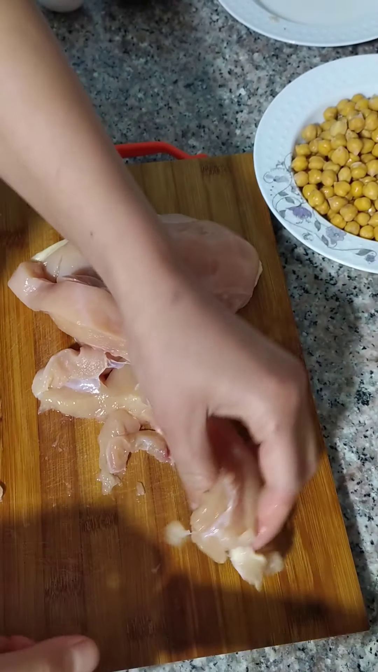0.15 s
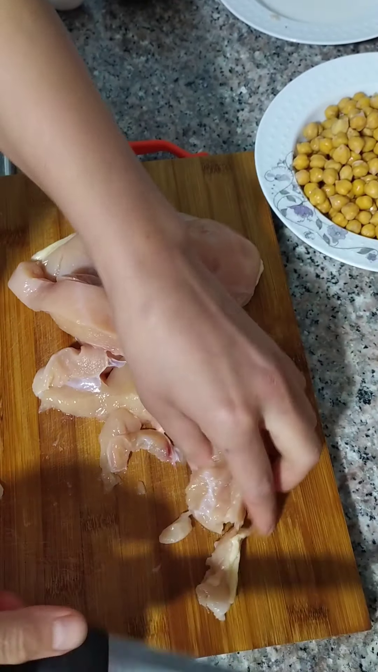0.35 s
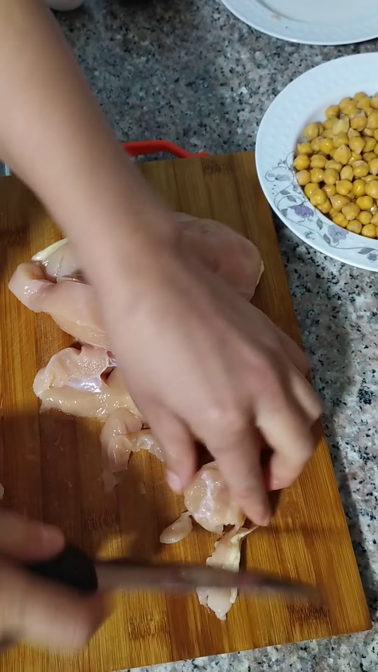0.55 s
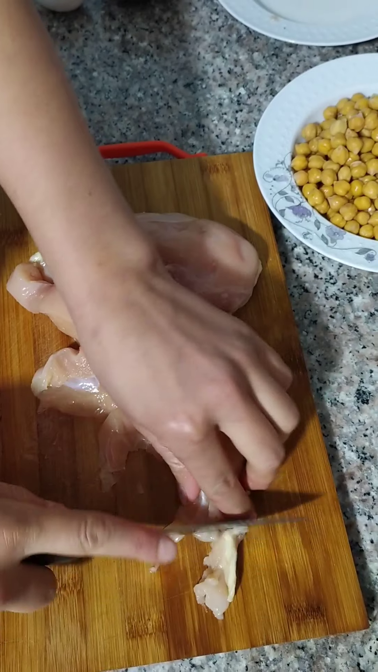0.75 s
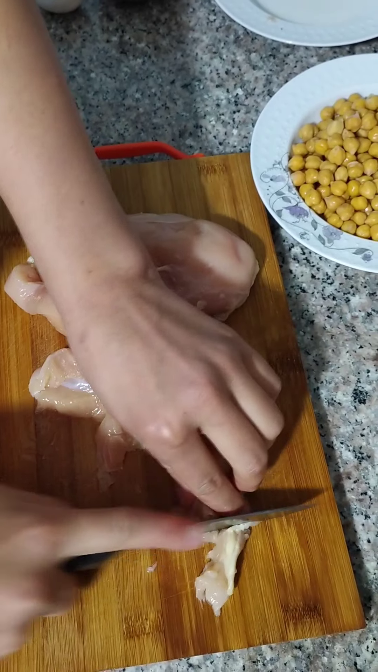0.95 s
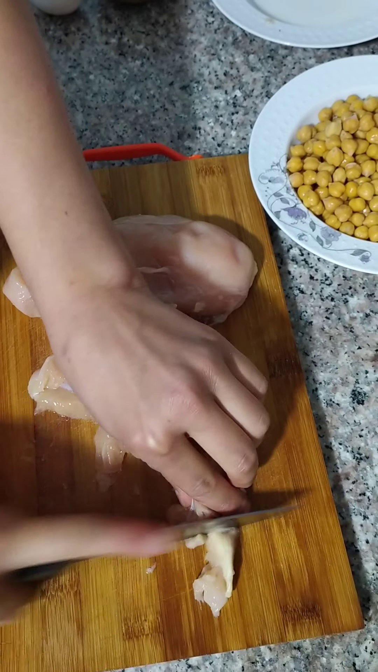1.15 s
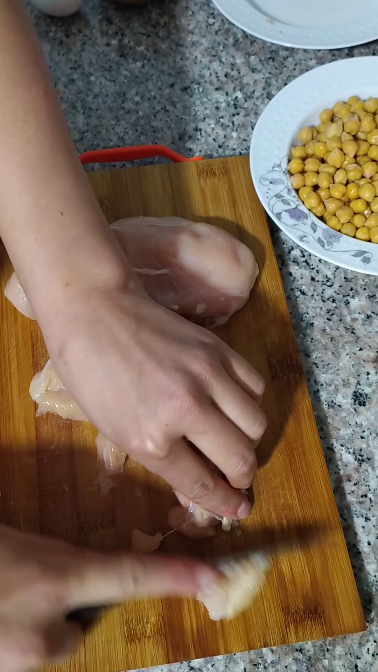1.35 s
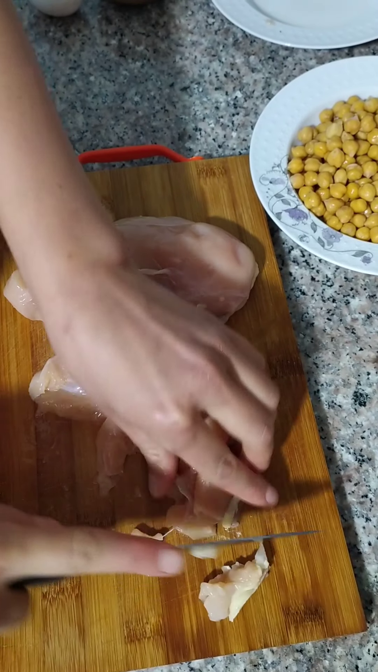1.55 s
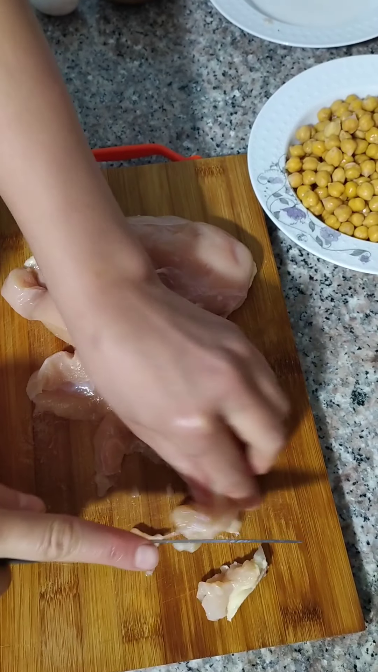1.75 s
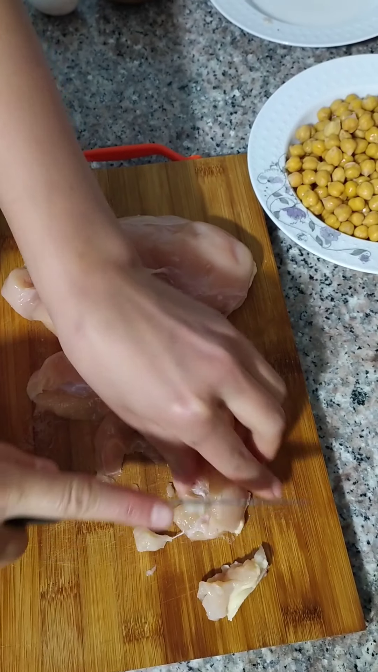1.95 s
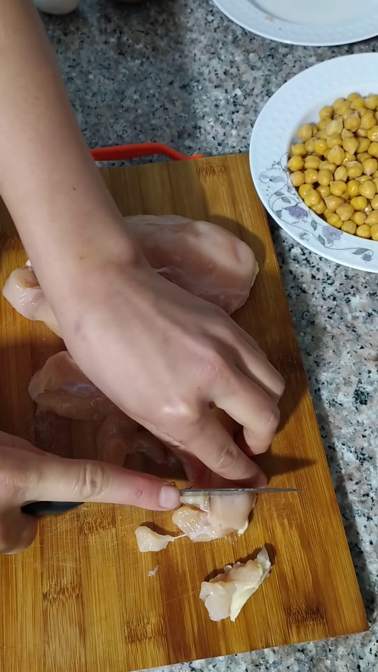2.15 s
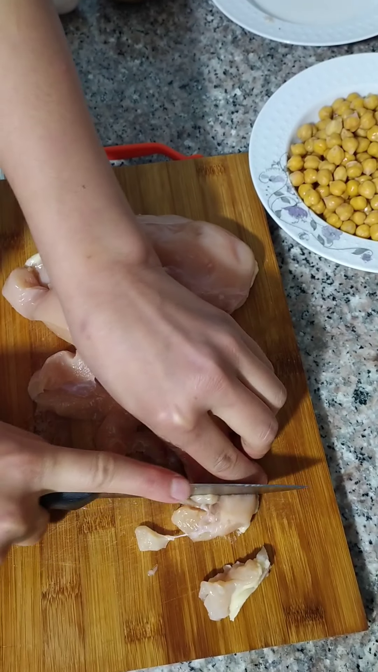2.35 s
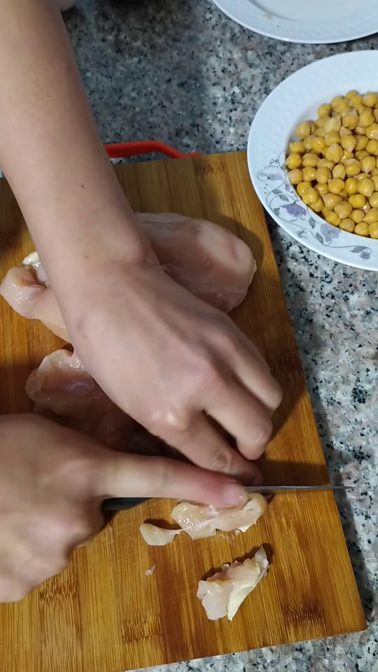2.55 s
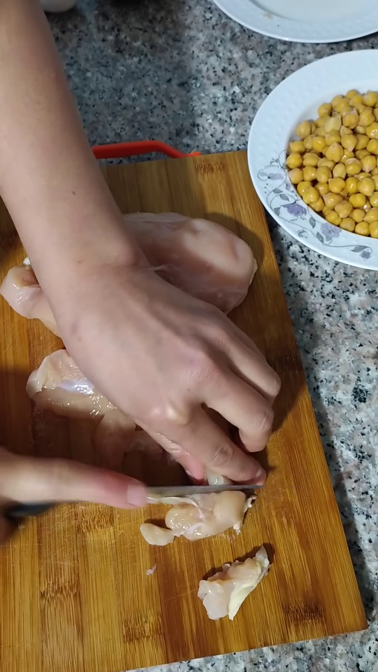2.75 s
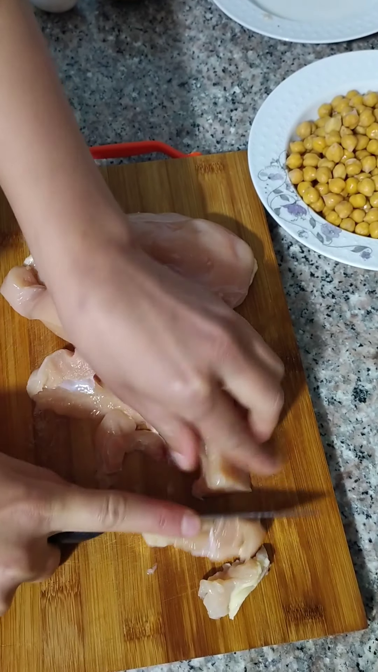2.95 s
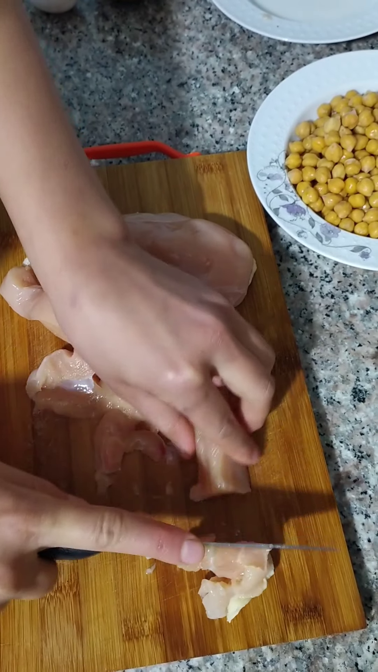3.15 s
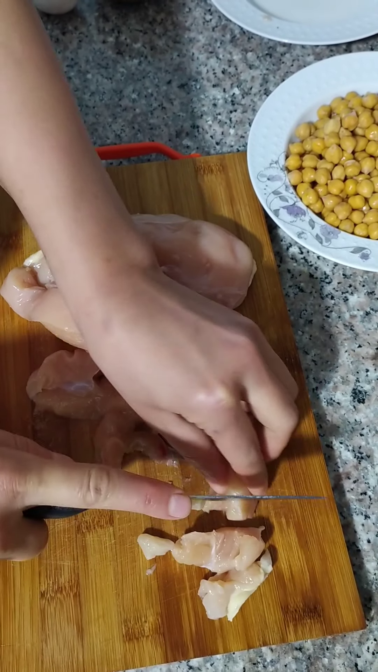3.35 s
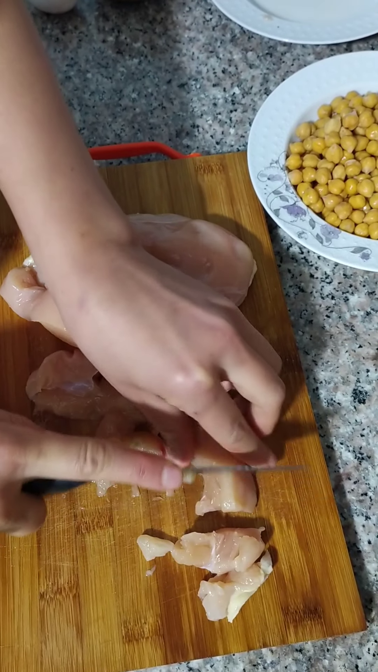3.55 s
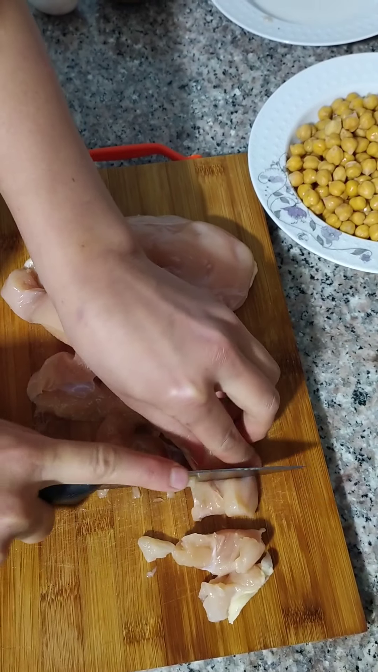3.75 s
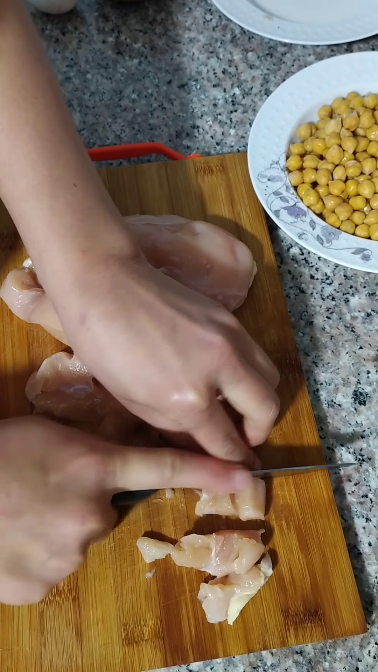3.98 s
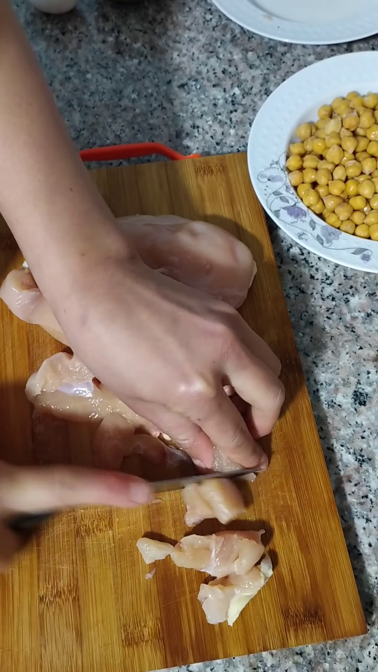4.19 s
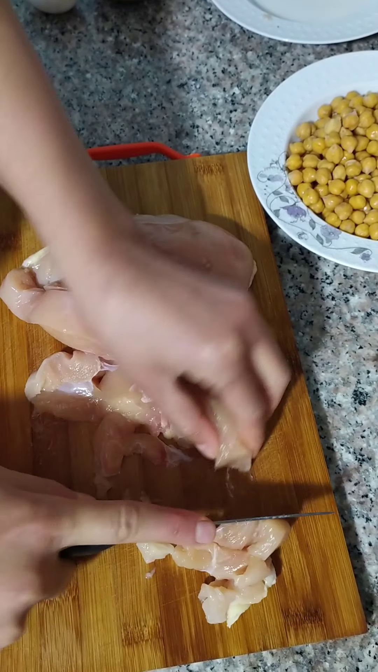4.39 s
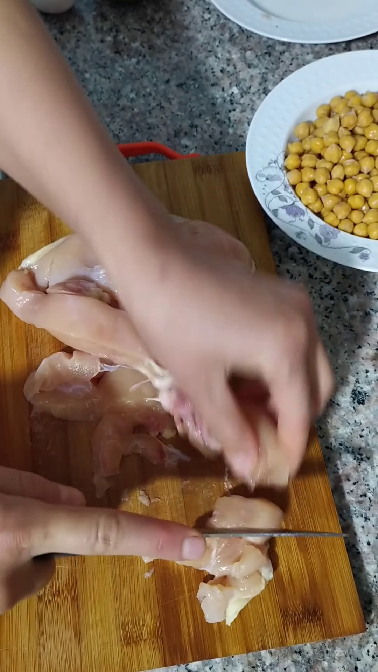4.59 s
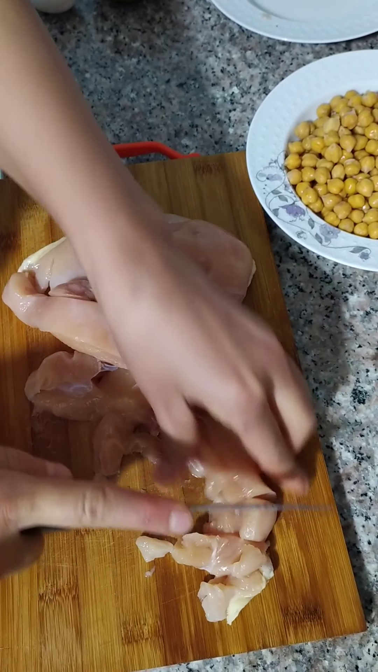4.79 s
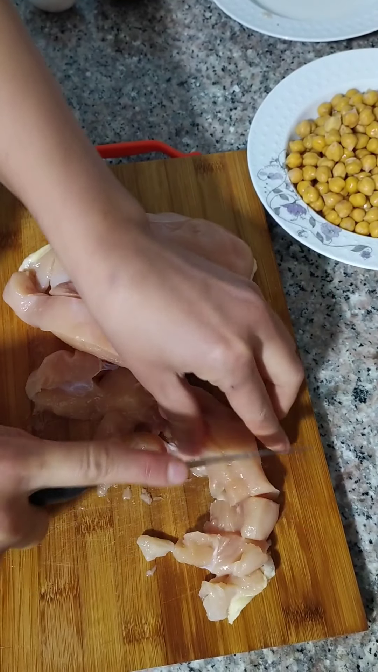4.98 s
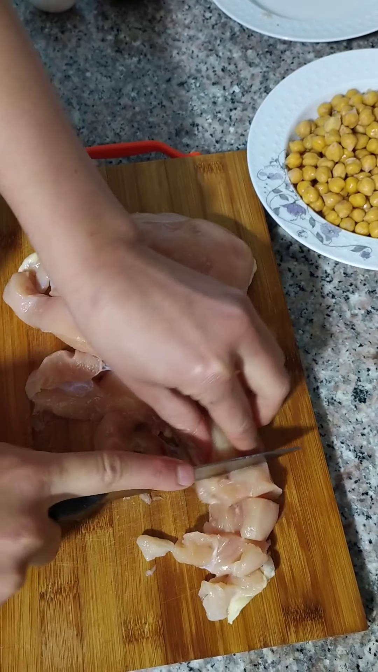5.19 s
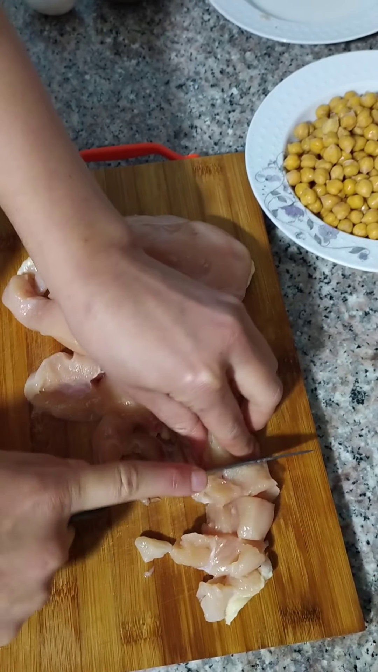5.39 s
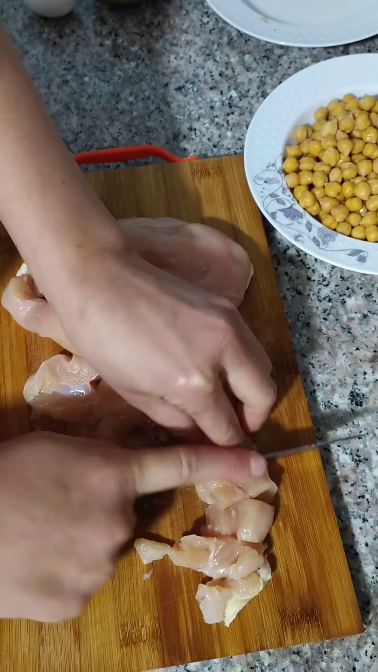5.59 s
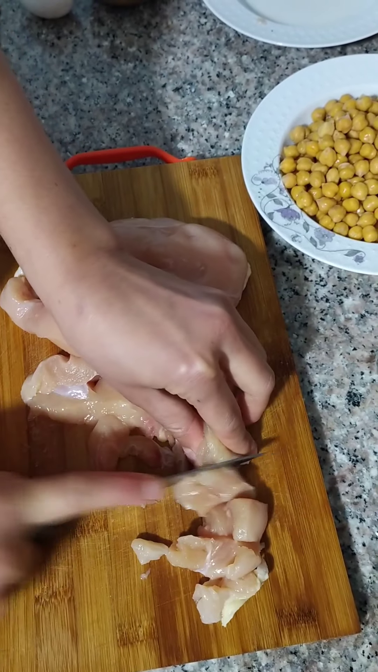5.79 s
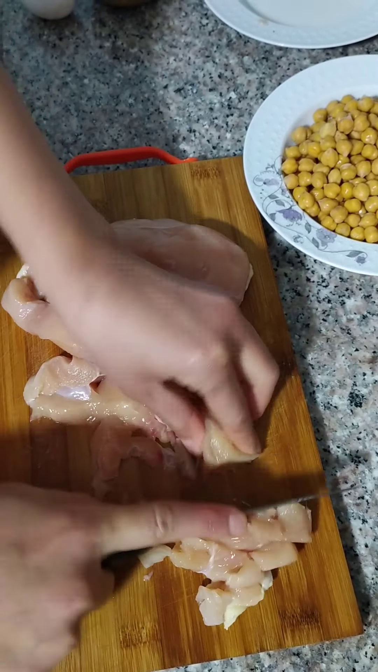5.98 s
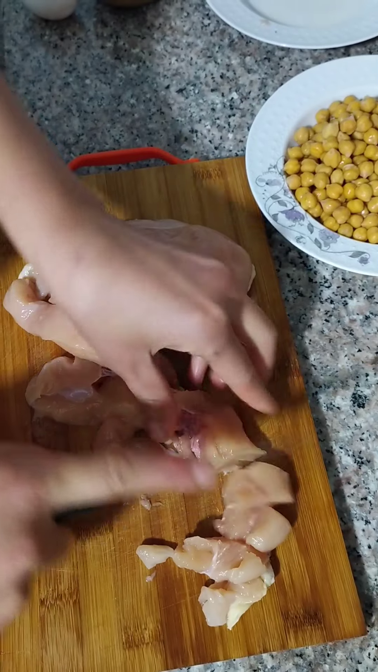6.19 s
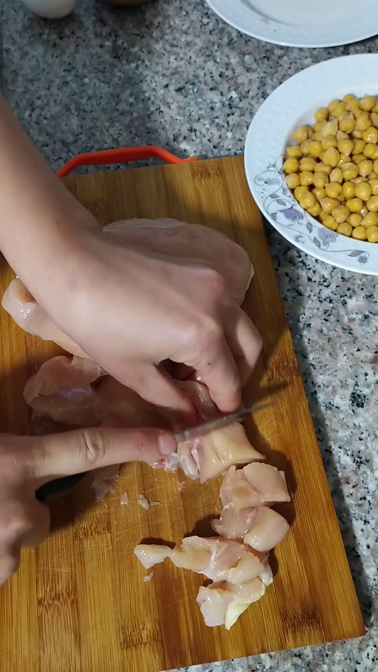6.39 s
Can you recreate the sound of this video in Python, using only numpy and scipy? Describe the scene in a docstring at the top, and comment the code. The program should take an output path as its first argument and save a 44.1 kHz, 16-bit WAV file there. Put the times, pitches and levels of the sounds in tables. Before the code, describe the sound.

Raw chicken drops on a wooden board with a low thud. A knife then saws through it in short, hissing strokes that end in irregular knocks on the wood. After a brief lull with only small wet smacks, the cutting resumes with a cluster of knocks and one last hard one. It is heard close up, over the faint room tone of a home kitchen.

```python
"""Raw chicken cut on a wooden board on a stone kitchen counter, heard through a phone's two ports;
the right one faces the board and whistles near 9 kHz. Wet meat smacks over the room tone and drops
on the board with a low thud at 0.5 s. From 1 s a knife saws, each stroke rubbing the board's modes
and hissing, with a run of knocks around 3 s. A soft pop follows, then only smacks as the meat is
handled. Cutting resumes at 4 s with dense knocks; the meat thuds at 4.8 s, a last hard knock at 6 s."""
import sys
import numpy as np
from scipy import signal
from scipy.io import wavfile
from scipy.ndimage import uniform_filter1d

SR = 44100
rng = np.random.default_rng(int(sys.argv[2]) if len(sys.argv) > 2 else 0)


def dump(signal):
    """Clip the signal to [-1, 1] and save it as 16-bit WAV at the path in sys.argv[1]."""
    limited = np.clip(np.atleast_2d(signal).T, -1, 1)
    pcm = np.round(limited * 32767).astype(np.int16)
    wavfile.write(sys.argv[1], SR, pcm)


N = 283563


def amp(db):
    """Decibels to gain."""
    return 10 ** (np.asarray(db) / 20)


def unit_rms(x):
    """Scales to rms 1."""
    return x / np.sqrt(np.mean(x ** 2) + 1e-20)


def value_at(points, hz):
    """Interpolates a table on a log frequency axis."""
    f, value = np.transpose(points)
    return np.interp(np.log(hz + 1), np.log(f + 1), value)


def add(mix, start_s, sound):
    """Mixes a sound in at a time."""
    part = mix[round(start_s * SR):][:len(sound)]
    part += sound[:len(part)]


def minimum_phase(colour):
    """A short filter of the given colour that starts at once."""
    log_gain = np.log(amp(value_at(colour, abs(np.fft.fftfreq(4096, 1 / SR)))))
    return np.fft.ifft(np.exp(np.conj(signal.hilbert(log_gain)))).real[:1024]


def resonate(x, hz, width_hz):
    """Two like resonators in series, centred on hz, which may glide."""
    carrier = np.exp(2j * np.pi * np.cumsum(np.broadcast_to(hz, x.shape)) / SR)
    pole = np.exp(-np.pi * width_hz / SR)
    for _ in range(2):
        x = 2 * (carrier * signal.lfilter([1 - pole], [1, -pole], x / carrier)).real
    return x


def friction(spread_db, fibres_per_s):
    """Noise whose strength jumps from fibre to fibre."""
    fibre = (np.arange(N) * fibres_per_s / SR).astype(int)
    return unit_rms(rng.standard_normal(N) * amp(spread_db * rng.standard_normal(fibre[-1] + 1)[fibre]))


def through_ports(left, right):
    """Each microphone port colours the sound that reaches it through the air."""
    # port responses: f/Hz, gain/dB
    left_port = [(1000, 13), (2300, -6), (3200, -14.5), (4200, -21), (5500, -27), (7000, -27.5),
                 (9400, -31.5), (13000, -31), (16000, -40)]
    right_port = [(1000, 8), (2300, 4.5), (3200, -1.5), (4200, -6), (5500, -6), (7000, -7.5), (8500, -2.5),
                  (9400, 1.5), (10200, -6), (11000, -11.5), (13000, -18.5), (16000, -29.5)]
    taps = np.array([minimum_phase(left_port), minimum_phase(right_port)])
    return signal.oaconvolve([left, right], taps, axes=1)[:, :N]


def room_tone():
    """Room tone and hiss in drifting patches, unrelated at the two ports, more rumble on the left."""
    # noise density: f/Hz, left level/dB per Hz, right level/dB per Hz
    density = [(12.2, -84.5, -92.5), (26.54, -66.5, -83.5), (38, -85.5, -88), (60.1, -83, -95),
               (100, -91.5, -93), (177, -84.5, -96), (328, -95, -99), (490, -100, -99), (855, -107, -109),
               (1960, -112, -113), (4300, -118, -119), (7000, -120, -119), (9400, -120, -115),
               (11900, -123, -122), (12800, -127, -127), (13530, -137, -137), (15430, -145, -145)]
    frames, hz = N // 512 + 5, np.fft.rfftfreq(2048, 1 / SR)
    left_re, left_im, right_re, right_im, patches = rng.standard_normal((frames, 1025, 5)).T
    white = np.array([left_re + 1j * left_im, right_re + 1j * right_im])
    patches = unit_rms(uniform_filter1d(uniform_filter1d(patches, 12, 0), 8, 1))
    steady_db = np.array([value_at(np.array(density)[:, [0, port]], hz) for port in (1, 2)])
    coloured = white * amp(steady_db[..., None] + 1.3 * patches)
    flat, tone = signal.istft([white, coloured], nperseg=2048, noverlap=1536)[1][..., :N]
    return tone / flat.std() * np.sqrt(SR / 2)


def kitchen_reverb(x):
    """The kitchen's reflections: sparse taps of random sign, the bass dying slowest."""
    # reverberation time: f/Hz, t60/s
    decay = [(100, 0.82), (500, 0.33), (2000, 0.28), (9000, 0.25)]
    taps = np.zeros((2, SR))
    arrivals = np.arange(200, SR - 20, 20) + rng.integers(0, 20, (2, (SR - 201) // 20))
    np.put_along_axis(taps, arrivals, rng.choice([-1., 1.], arrivals.shape), 1)
    hz, t, bands = signal.stft(taps, SR, nperseg=256)
    tail = signal.istft(bands * amp(-60 * t / value_at(decay, hz)[:, None]), SR, nperseg=256)[1]
    return signal.fftconvolve(x, tail / np.linalg.norm(tail[0]), axes=1)[:, :N]


def soft_pop():
    """One soft low pop close to the left port; its pitch drops as it dies."""
    # the pop: t/s, level/dB, first f/Hz, last f/Hz, glide time/s, t60/s, right against left/dB
    pop = (3.1555, -31, 800, 130, .004, .05, -14)
    start_s, db, first_hz, last_hz, glide_s, t60, right_db = pop
    t, out = np.arange(3000) / SR, np.zeros(N)
    cycles = np.cumsum(last_hz + (first_hz - last_hz) * np.exp(-t / glide_s)) / SR
    attack = (1 - np.exp(-t / 0.0014)) ** 2
    add(out, start_s, amp(db - 60 * t / t60) * attack * np.sin(2 * np.pi * cycles))
    return out * amp([[0], [right_db]])


def meat_smacks():
    """A film of juice snaps: a click and a short spray around its centre pitch."""
    # wet smacks: t/s, relative level/dB, centre f/Hz
    smacks = [(0.148, -52.5, 10400), (0.314, -64, 10000), (0.4566, -37, 5860), (0.844, -53.5, 10100),
              (0.9202, -46, 7600), (0.948, -60, 6000), (0.9938, -54, 8000), (1.046, -51.5, 6500),
              (1.0843, -40.5, 6500), (1.44, -49.5, 9480), (1.5614, -63.5, 9490), (1.627, -62, 9800),
              (1.8387, -63.5, 9560), (1.883, -63.5, 9830), (1.8925, -68.5, 8710), (2.0335, -54, 8930),
              (2.625, -50.5, 8500), (2.9401, -43.5, 5200), (3.149, -54.5, 8600), (3.3691, -49, 11000),
              (3.375, -50.5, 10000), (3.467, -48.5, 10200), (3.6015, -54.5, 9800), (3.6096, -58, 9720),
              (3.8486, -48, 10020), (4.066, -47.5, 9000), (4.492, -57, 9500), (4.512, -54, 7500),
              (4.539, -57, 10600), (4.555, -52.5, 9400), (4.5785, -56, 9400), (4.6231, -51, 9200),
              (4.6923, -58.5, 8590), (4.7242, -54, 9440), (4.794, -40.5, 4180), (4.809, -36, 8950),
              (5.634, -42.5, 9650), (5.9906, -42, 9620), (6.1795, -42.5, 9800), (6.2847, -63, 9320)]
    spray_t60_s = 0.049
    t, out = np.arange(3000) / SR, np.zeros(N)
    for start_s, db, hz in smacks:
        snap = 6.5 * (t == 0) + rng.standard_normal(len(t)) * amp(-60 * t / spray_t60_s)
        add(out, start_s, amp(db + 7.5) * resonate(snap, hz, width_hz=4540))
    out = signal.sosfilt(signal.butter(4, 3500, "high", fs=SR, output="sos"), out)
    return through_ports(out, out)


def knife_strokes():
    """Strokes swell to their fastest moment and fade: gains (hiss, high, mid, low) and blade pitch."""
    # strokes: fastest t/s, rise/s, fall/s, relative hiss level/dB,
    # high, low and mid mode drive against the hiss/dB, blade f/Hz
    strokes = [(0.459, 0.0062, 0.031, -54.5, 5, 15.5, 1, 2130),
               (1.04, .05, 0.025, -82, -15.5, 18.5, -3, 2020), (1.144, .07, 0.052, -62, 2, 6, 8.5, 1930),
               (1.29, 0.059, 0.085, -57.5, 4, 4.5, 6.5, 1915), (1.415, 0.034, .05, -63, 6, 1, -1.5, 1930),
               (1.461, 0.023, 0.047, -48, 6, 20.5, 17, 1880),
               (1.788, 0.035, 0.045, -67.5, 9, 21.5, 14, 2240),
               (1.904, 0.022, 0.049, -72, -17.5, -3.5, -15, 2180),
               (2.59, 0.057, 0.11, -70.5, -7, 16, -4.5, 1970),
               (2.633, .02, 0.045, -64, 20.5, 30, 22.5, 1900),
               (2.689, 0.0414, 0.059, -66, 1.5, 15, 12, 1880),
               (2.823, 0.073, 0.072, -57, 7.5, 5.5, 2.5, 2130),
               (2.952, 0.048, 0.066, -58, 7.5, 15.5, 3.5, 2090),
               (3.057, .05, 0.059, -60.5, 4, 21.5, 4, 1940),
               (3.16, .03, 0.087, -81.5, -14.5, 16, -10, 1930), (4.02, 0.032, 0.055, -69, 1, 21, 4, 1940),
               (4.085, 0.039, 0.11, -63.5, 7.5, 20, 13, 1850), (4.243, 0.067, .08, -58.5, 9.5, 8, 2, 2050),
               (4.384, 0.037, 0.07, -49.5, 10.5, 23.5, 12, 1990),
               (4.807, .012, 0.025, -49, 3.5, 10, -7, 2080), (4.88, 0.044, 0.13, -88.5, 1.5, 21, 15, 2120),
               (5.22, .08, 0.45, -90, 7, 23, 5, 2110), (5.649, 0.11, 0.19, -62, -6.5, 7.5, -1, 2030),
               (5.826, 0.061, 0.1, -58, 7.5, 9, 0, 2050), (5.954, 0.033, 0.084, -61, 6, 11.5, 0.5, 2030),
               (6.008, 0.03, 0.084, -50, 9.5, 21, 9, 1970), (6.17, 0.08, 0.038, -72.5, -5, 15, 0, 2040)]
    # factors on the swing in dB: hiss, high, mid, low modes
    follow = (0.9, 1.1, 1.06, 1.14)
    roundness, climb_hz_per_s = 1.66, 300  # roundness 1 is a pointed stroke, 2 a rounded one
    t, power, weighted_hz = np.arange(0, N / SR + .01, .002), 1e-30, 0
    for peak_s, rise_s, fall_s, hiss_db, high_db, low_db, mid_db, hz in strokes:
        from_peak = abs(t - peak_s) / np.where(t < peak_s, rise_s, fall_s)
        swing_db = np.where(t < peak_s, -14.5, -20.5) * np.minimum(from_peak, 8) ** roundness
        peak_db = hiss_db + np.array([[0], [high_db], [mid_db], [low_db]])
        stroke_power = amp(peak_db + np.outer(follow, swing_db)) ** 2
        power += stroke_power
        weighted_hz += stroke_power[1] * (hz + climb_hz_per_s * np.clip(t - peak_s, -rise_s, fall_s))
    return [np.interp(np.arange(N) / SR, t, curve) for curve in (*np.sqrt(power), weighted_hz / power[1])]


def edge_hiss(gain):
    """The edge against wet fibres and wood: fine grit above the board's modes."""
    highpass = signal.butter(2, 2600, "high", fs=SR, output="sos")
    left, right = (signal.sosfilt(highpass, friction(1.6, 300)) for _ in range(2))
    return amp(3.5) * gain * unit_rms(through_ports(left, right)) * np.sqrt(2)


def blade_ring(gain, hz):
    """The scraped blade sings in two bands that climb as it slides; the upper faces the right port."""
    lower, lower_right = (unit_rms(resonate(friction(3.5, 300), hz, width_hz=560)) for _ in range(2))
    upper = unit_rms(resonate(friction(2.0, 280), 1.7 * hz, width_hz=500))
    lower_pair = np.array([lower, amp(6.5) * (.5 * lower + 1.1 * lower_right)])
    return amp(-1) * gain * (lower_pair + amp([[-22], [-7]]) * upper)


def mode_ring(modes, rise_cycles):
    """A struck family of board modes at the two ports; each mode swells briefly, then dies away."""
    t, out = np.arange(SR // 2) / SR, 0
    for hz, left_db, right_db, t60, left_lead in modes:
        decay = amp(np.array([[left_db], [right_db]]) - 60 * t / t60)
        attack = (1 - np.exp(-t * hz / rise_cycles)) ** 2
        out += decay * attack * np.sin(2 * np.pi * hz * t + [[left_lead], [0]])
    return out / abs(out.mean(0)).max()


def cutting_board(high, mid, low):
    """Knocks, thuds and the knife's rubbing drive the same modes of the wooden board."""
    # board modes by family: f/Hz, relative left and right level/dB, t60/s, left phase lead/rad
    families = { "thud": [(97.2, -4.5, -7, 0.39, 0.34), (161.3, -1.5, 0.5, 0.12, 0.15),
                (259.2, -5, -1.5, 0.082, 0.2)], "low": [(327.4, -18, -23.5, 0.22, 0.38),
                (436, -16, -10, 0.05, 0.77), (480, -3, 4, 0.054, 1), (508.5, -5.5, 4, 0.069, 0.7),
                (510, -13.5, -4.5, 0.026, .4), (631, -13, -23, 0.027, 0.3),
                (747.4, -13, -11.5, 0.07, 0.31)], "mid": [(923.5, -2.5, -2, 0.063, 1.01),
                (1155, -12.5, -6, 0.037, -0.2), (1344, -9, -8.5, 0.056, 1.62), (1432, -11, -24, 0.043, 3)],
                "high": [(1456, -6, -8, 0.13, 2.5), (1740, -3, 0, 0.027, 2.5),
                (1900, -5.5, 1.5, 0.029, 1.13), (2020, 0, 4.5, 0.022, -1.6), (2250, -6.5, -11, 0.065, 3.5),
                (2420, -12.5, -5, 0.04, 4.5), (2594, -25, -8, 0.06, -0.5), (2868, -30.5, -17, 0.038, 1.3),
                (3030, -33, -11, 0.022, -14.5), (3330, -30.5, -25.5, 0.017, 0),
                (4100, -36.5, -21, 0.034, 5.5)]}
    # knocks and thuds on the board: t/s, low mode level/dB, thud, mid and high modes against it/dB
    impacts = [(0.462, -24.5, -14.5, -10, -20), (0.521, -43, -3, -11.5, -19),
               (1.055, -51.5, -6.5, -29, -32), (1.446, -40, -26, -10.5, -10.5),
               (1.459, -21.5, -38.5, 4.5, -13.5), (1.664, -55.5, -27, -9, -2),
               (1.754, -43.5, -12, -7, -13.5), (2.042, -57.5, -15, -19, -9), (2.625, -17, -35, -3.5, -4),
               (2.656, -48, -3, -23, -24), (2.941, -28.5, -36, -3, 0.5), (2.954, -30, -22, -33, -23),
               (2.988, -33.5, -32, -5.5, -7.5), (3.043, -36.5, -31, -4.5, -13), (3.061, -30, -35, -28, -17),
               (3.089, -35.5, -20.5, -12.5, -12.5), (4.016, -42.5, -17.5, -8.5, -14),
               (4.068, -16.5, -32, -5, -4), (4.101, -34.5, -19, -11, -7.5), (4.356, -34, -47.5, -12.5, -11),
               (4.365, -17.5, -37.5, -9.5, -3.5), (4.38, -21.5, -44.5, 4, -10),
               (4.396, -19, -39.5, -10, -2), (4.413, -29, -29.5, -19, -16), (4.441, -36, -29, -15.5, -3.5),
               (4.798, -26, -25, -2, -21), (4.812, -46.5, 6, -27, -2), (5.194, -57, -26, -4.5, 1),
               (5.645, -36, -11, -22.5, -8), (6.0, -16, -41, -10, -10.5), (6.027, -40, -27, -8, -10.5),
               (6.054, -25, -32, -15, -26), (6.408, -55.5, -22, -7.5, -8)]
    rub = {"thud": amp(-30.5) * low, "low": low, "mid": mid, "high": amp(-3.5) * high}
    rise_cycles = {"thud": .4, "low": .9, "mid": .8, "high": .5}
    delay_s = {"thud": .004, "low": .0003, "mid": -.001, "high": -.0022}  # short bending waves run faster
    t, out = np.arange(400) / SR, np.zeros((2, N))
    # each blow lands, then chatters briefly on the wood
    blows = (t == 0) + 0.04 * rng.standard_normal((len(impacts), len(t))) * np.exp(-t / 0.0015)
    for family, modes in families.items():
        response = mode_ring(modes, rise_cycles[family])
        drive = rub[family] * friction(4.3, 150) / np.linalg.norm(response.mean(0))
        for (start_s, db, thud_db, mid_db, high_db), blow in zip(impacts, blows):
            family_db = {"thud": thud_db, "low": 0, "mid": mid_db, "high": high_db}[family]
            add(drive, start_s + delay_s[family], amp(db + family_db) * blow)
        out += signal.oaconvolve(drive[None], response, axes=1)[:, :N]
    return out


def scene():
    """Board, blade and meat at the counter, with the kitchen faint behind them."""
    hiss_gain, high, mid, low, blade_hz = knife_strokes()
    ringing = cutting_board(high, mid, low) + blade_ring(high, blade_hz)
    meat = edge_hiss(hiss_gain) + meat_smacks()
    reverb = kitchen_reverb(amp(-15) * ringing + amp(-10) * meat)
    return ringing + meat + reverb + soft_pop() + room_tone()


def record(dry):
    """The phone's steep treble limit."""
    edge_hz = 15550
    lowpass = signal.firwin(511, edge_hz, window=("kaiser", 9), fs=SR)
    return signal.oaconvolve(dry, lowpass[None], "same")


dry = scene()
out = record(dry)
dump(out)
```